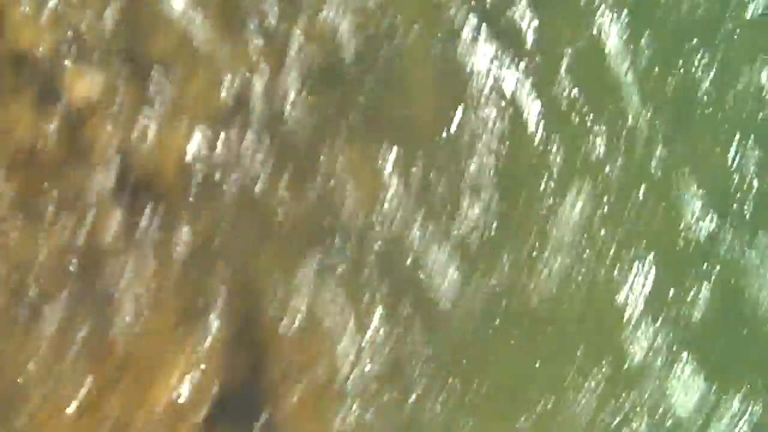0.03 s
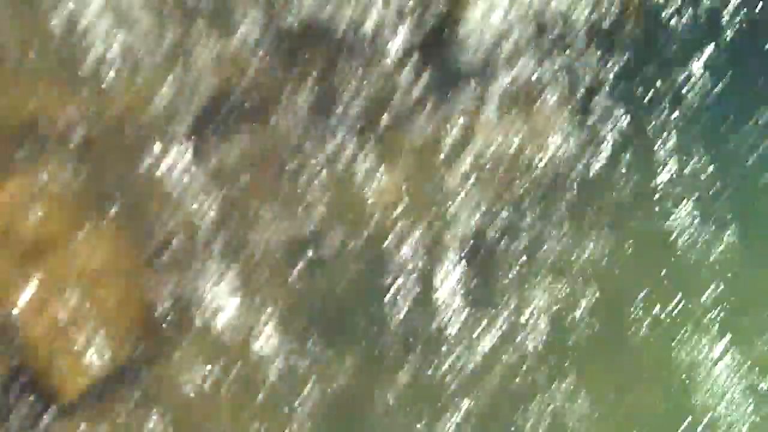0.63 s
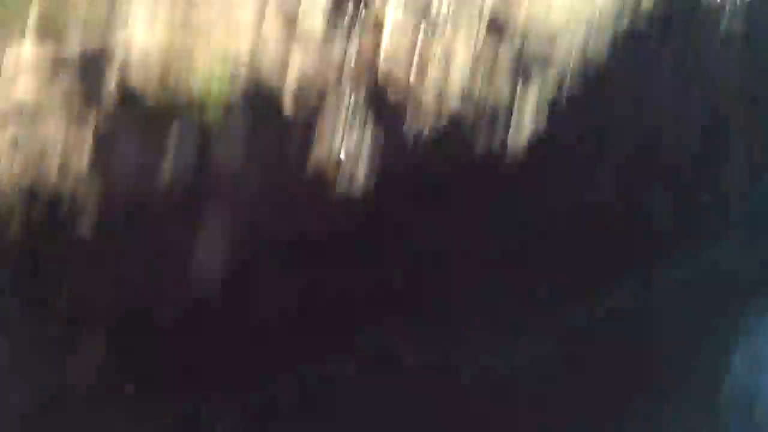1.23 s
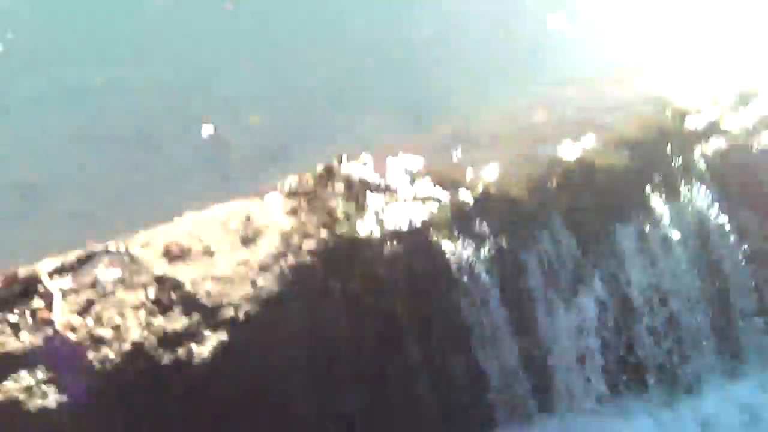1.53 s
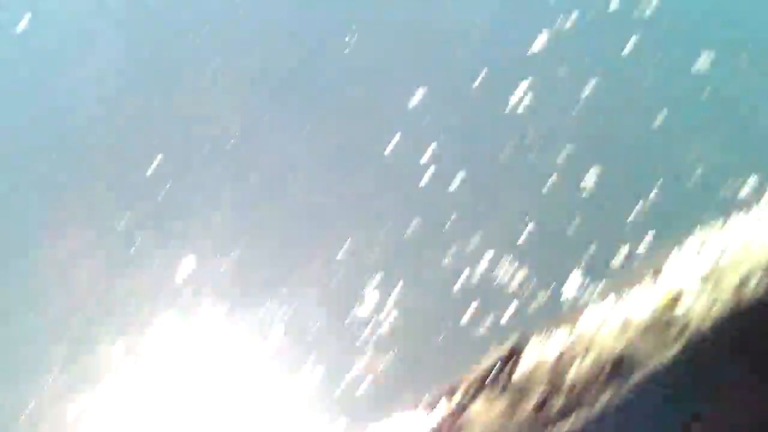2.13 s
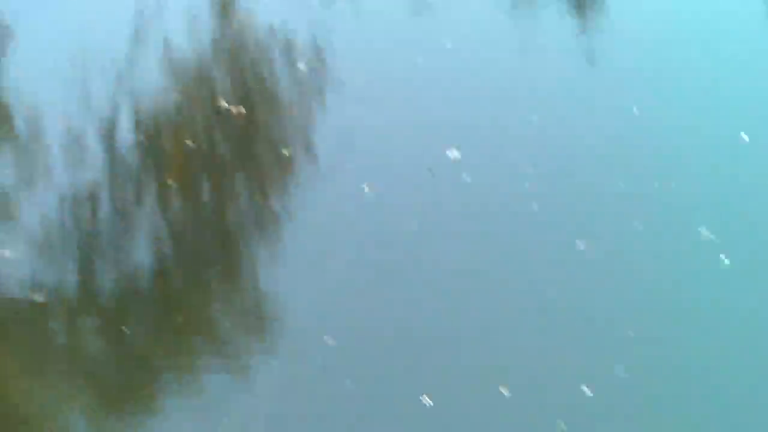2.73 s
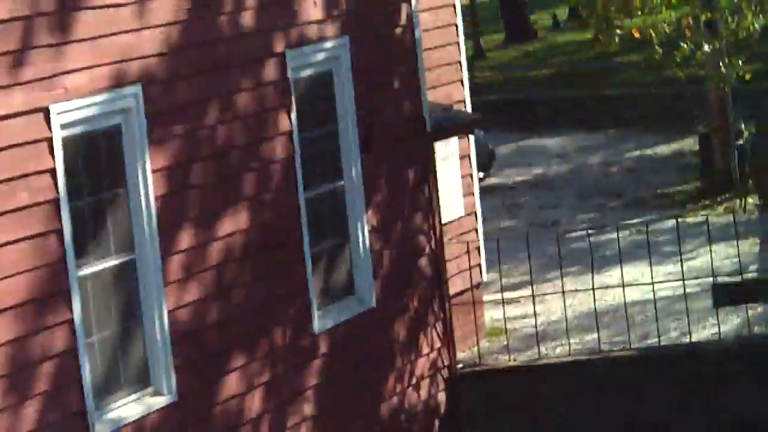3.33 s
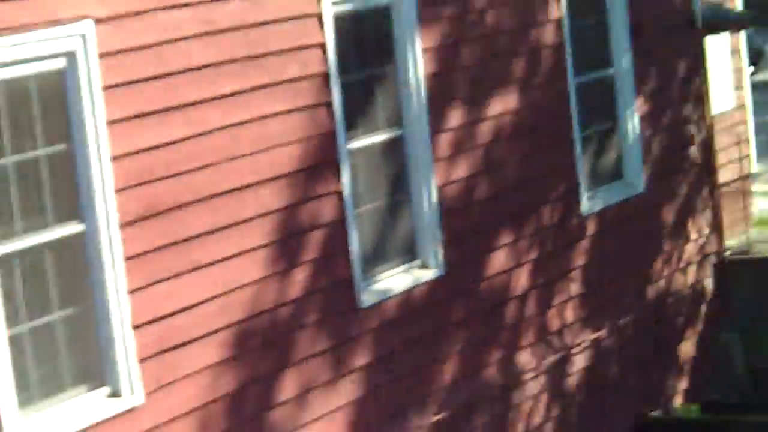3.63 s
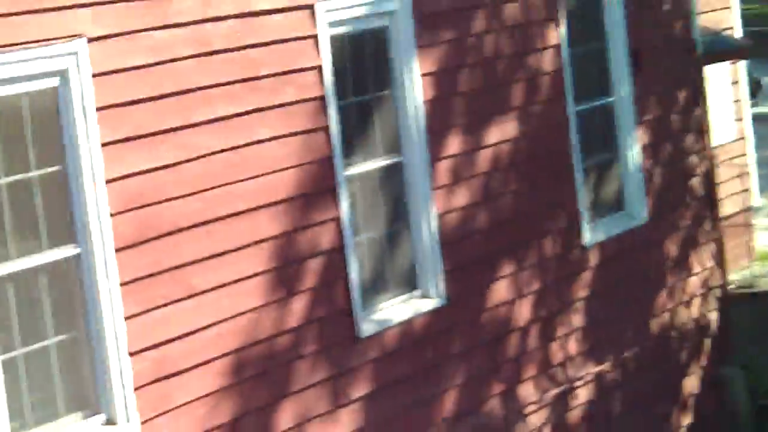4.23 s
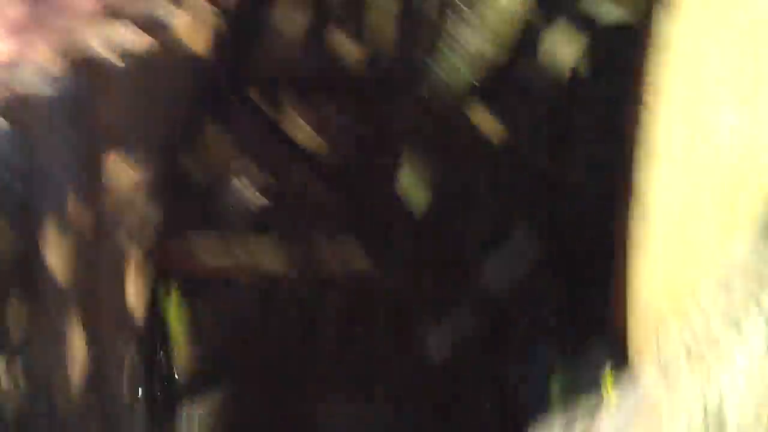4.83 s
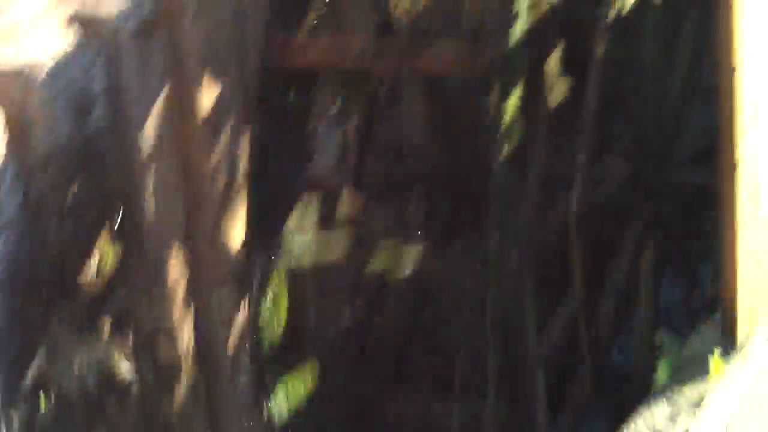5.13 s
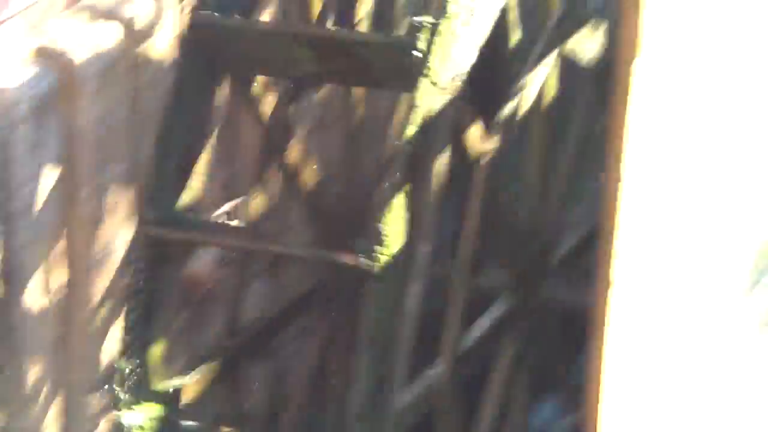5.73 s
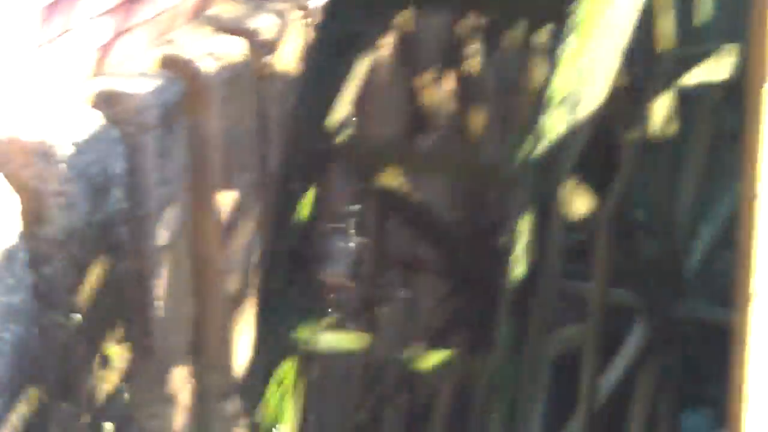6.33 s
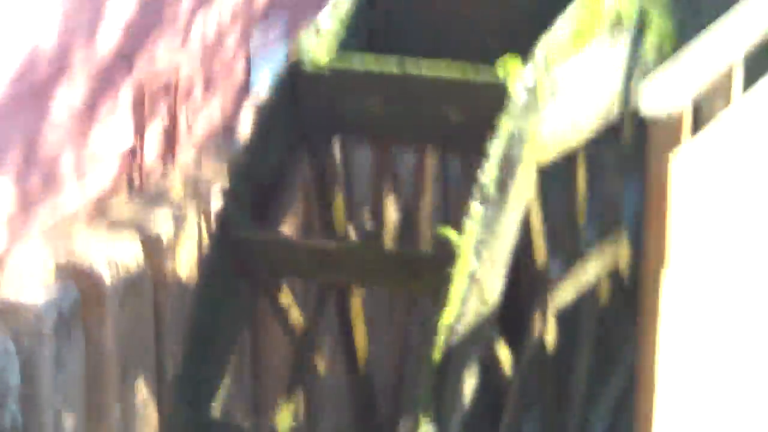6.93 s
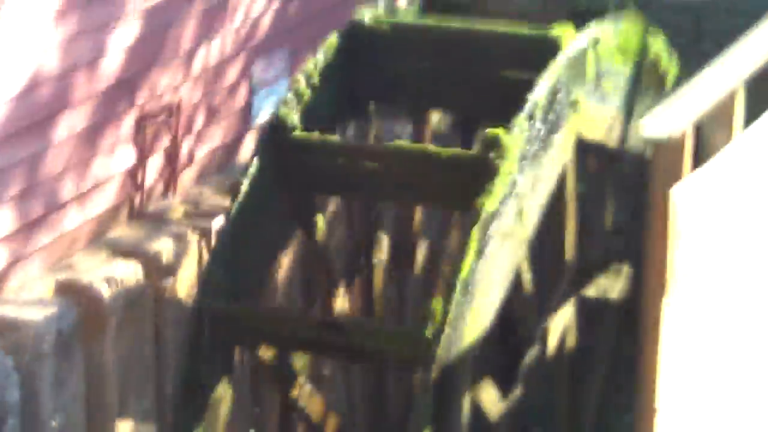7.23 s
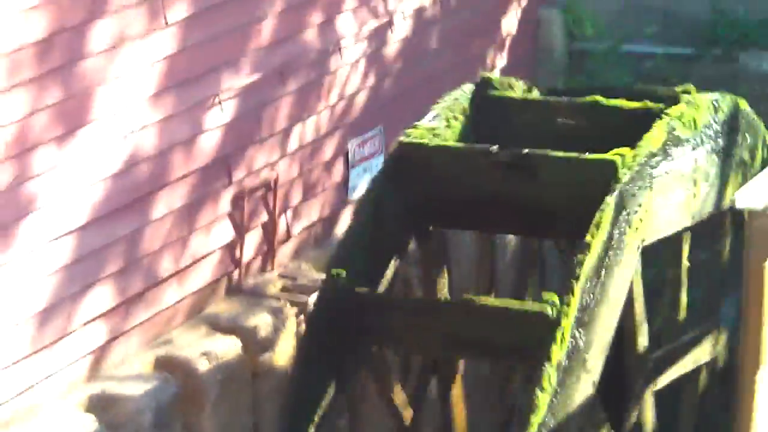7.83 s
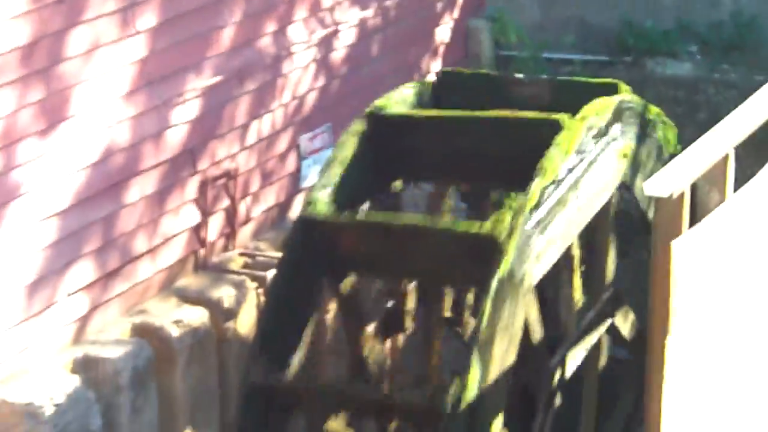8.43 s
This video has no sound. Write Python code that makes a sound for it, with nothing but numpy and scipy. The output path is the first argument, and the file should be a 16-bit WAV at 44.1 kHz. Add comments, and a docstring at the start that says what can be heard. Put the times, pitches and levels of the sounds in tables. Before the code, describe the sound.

A close, bubbling rush of water pulses as a mill wheel's buckets empty, with hollow gulps and low thumps of wind.

```python
"""A close rush of water, full of bubbles and spatter, pours over a low weir and off a turning mill wheel.
It surges as each bucket empties, a little over twice a second, and trapped air booms and gulps in it.
Gusts buffet the hand-held microphone; the colour shifts as it swings from stream to pond to wheel.
The weir throbs in passing; near the wheel, water churns with a hollow note and slaps the boards."""
import sys
import numpy as np
from scipy import signal
from scipy.fft import rfft, irfft, next_fast_len
from scipy.io import wavfile
from scipy.ndimage import uniform_filter1d

SR = 44100
rng = np.random.default_rng(int(sys.argv[2]) if len(sys.argv) > 2 else 0)


def generate_wav(sig):
    """Save sig (samples, or channels by samples) to the path in sys.argv[1] as 16-bit PCM at SR."""
    pcm = np.round(np.clip(np.atleast_2d(sig).T, -1, 1) * 32767).astype(np.int16)
    wavfile.write(sys.argv[1], SR, pcm)


N = 382788
T = np.arange(N) / SR


def gain_of(db):
    """Decibels to amplitude."""
    return 10 ** (np.asarray(db) / 20)


def unit_rms(x):
    """Scales to an rms of 1."""
    return x / np.sqrt(np.mean(x ** 2) + 1e-20)


def follow(rows):
    """The columns of a timed table, interpolated at every sample."""
    times, *columns = np.transpose(rows)
    return [np.interp(T, times, column) for column in columns]


def swell(centre_s, length_s):
    """A smooth rise and fall of height 1."""
    return np.exp(-(2 * (T - centre_s) / length_s) ** 2)


def filtered(x, gain):
    """Filters x by a gain given as a function of frequency."""
    size = next_fast_len(N)
    hz = np.fft.rfftfreq(size, 1 / SR) + 1e-3
    return irfft(rfft(x, size) * gain(hz), size)[:N]


def coloured(x, spectrum):
    """Gives x a spectrum that falls away beyond its end points, at an rms of 1."""
    points_hz, db = np.transpose(spectrum)

    def gain(hz):
        skirts = np.minimum(hz / points_hz[0], 1) ** 2 * np.minimum(points_hz[-1] / hz, 1) ** 2
        return skirts * gain_of(np.interp(np.log(hz), np.log(points_hz), db))
    return unit_rms(filtered(x, gain))


def noise_band(centre_hz, width_hz):
    """Noise in a bell-shaped band."""
    return filtered(rng.standard_normal(N), lambda hz: np.exp(-((hz - centre_hz) / width_hz) ** 2))


def wander(rate_hz):
    """Slow random motion of rms 1, up to about rate_hz."""
    return unit_rms(noise_band(0, rate_hz))


def foam(patchy_db, flutter_hz, bands=8):
    """Countless far bubbles merge to a hiss in which each size of bubble swells on its own."""
    noise, out = rng.standard_normal(N), np.zeros(N)
    log_centres = np.log(np.geomspace(300, 6000, bands))
    for share in np.eye(bands):
        band = filtered(noise, lambda hz: np.interp(np.log(hz), log_centres, share))
        out += band * gain_of(patchy_db * wander(flutter_hz))
    return unit_rms(out)


def bubbles(density, decay_cycles, rise, spread_db, sizes=40):
    """Each bubble rings briefly, rising in pitch as it nears the surface; small ones are more common."""
    out = np.zeros(N)
    for hz in np.geomspace(350, 6500, sizes):
        age = np.arange(int(5 * decay_cycles * SR / hz)) * hz / SR / decay_cycles  # in decay times
        envelope = np.exp(-age) * (1 - np.exp(-age * decay_cycles * 2))
        ring = envelope * np.sin(2 * np.pi * decay_cycles * age * (1 + rise * age))
        strength = gain_of(spread_db * np.minimum(rng.exponential(1, N), 3.5))
        births = rng.random(N) < density / sizes * np.sqrt(hz / 1500) / SR
        out += np.sqrt(hz) * unit_rms(signal.oaconvolve(strength * births, ring)[:N])
    return unit_rms(out)


def spatter(per_s, spread_db):
    """Drops hit the water and the wet boards as tiny clicks of uneven size."""
    strength = gain_of(spread_db * np.minimum(rng.exponential(1, N), 4))
    polarity = rng.choice([-1, 1], N)
    hits = rng.random(N) < per_s / SR
    return unit_rms(strength * polarity * hits)


# The flow between buckets, from where the microphone is held.
# Each row: time in seconds, then the levels of churn, spray and boom in dB.
STEADY_FLOW = [(0, -24, -26.5, -26.5), (1.2, -23, -26, -28.5), (3.4, -24.5, -29, -27), (5, -24, -28.5, -27),
               (8.68, -23.5, -28, -31)]
# Buckets emptying off the wheel.
# Each row: centre and length in seconds, then the swells of churn, spray and boom in dB.
BUCKET_SURGES = [(0.303, 0.16, 2, 1.8, 3), (0.74, 0.1, 1, 3, 5), (1.11, 0.26, 0, 2, 7),
                 (1.508, 0.099, 0, 1.8, 8.5), (1.95, 0.22, 1, 0.5, 4), (2.414, 0.17, 3.5, 0, -3),
                 (2.852, 0.16, 3, 2, 0), (3.285, 0.22, 3, 2, 0), (3.69, 0.075, 1.5, 1.5, 1),
                 (4.114, 0.32, 2.5, 1.5, 0), (4.535, 0.14, 2.5, 2.5, 0.5), (4.964, 0.35, 2, 2.2, -3.5),
                 (5.428, 0.22, 2, 1, 0.5), (5.733, 0.16, 2.5, 2, 2.5), (6.12, 0.26, 0, 1, 2),
                 (6.543, 0.13, 3, 2.5, 2.5), (6.93, 0.16, 1.5, 1.5, 3), (7.375, 0.2, 2, 1, 0.5),
                 (7.684, 0.36, 0.5, 1.5, 4), (8.163, 0.16, 2.5, 2, 1.5), (8.56, 0.21, 2, 2, 3.5)]


def flow():
    """Levels in dB of churn, spray and boom: the steady flow plus a swell as each bucket empties."""
    levels_db = np.array(follow(STEADY_FLOW))
    for centre_s, length_s, *swells_db in BUCKET_SURGES:
        levels_db += np.outer(swells_db, swell(centre_s, length_s))
    return levels_db


# The rush with the microphone on the stream, on the pond and on the wheel.
# Each row: frequency in Hz, relative level in dB.
STREAM_SPECTRUM = [(150, -17), (300, 4.5), (400, 1.5), (540, 0), (660, 3.5), (880, -2), (1200, 0),
                   (1750, -9), (2700, -10.5), (3400, -12.5), (3900, -17), (4600, -19.5), (5600, -29),
                   (7000, -39.5)]
POND_SPECTRUM = [(150, -9.5), (290, 5), (420, 2), (600, -1), (850, -2), (1020, -5.5), (1300, -2.5),
                 (1900, -11.5), (2700, -12.3), (3150, -12), (3380, -10), (3800, -15), (4700, -18),
                 (5600, -26.5), (6300, -30.5), (7000, -43.5)]
WHEEL_SPECTRUM = [(150, -10), (300, 4.5), (400, 2), (520, -1.5), (620, 0.9), (1000, -4), (1500, -4.5),
                  (2000, -8), (2550, -12), (3600, -11.5), (4100, -15), (4700, -18.5), (5600, -26.5),
                  (7000, -40)]
# The swing of the microphone. Each row: time in seconds, aim (0 stream, 1 pond, 2 wheel).
MIC_AIM = [(0, 0.13), (1.25, 0.091), (1.85, 0.96), (3.3, 1.3), (4.23, 2)]


def rush(churn_db, spray_db, split_hz=1700):
    """Foam, bubbles and spatter, coloured by the aim of the microphone and surging with the flow."""
    water = foam(patchy_db=0.63, flutter_hz=14)
    water += gain_of(-8) * bubbles(density=3200, decay_cycles=7.44, rise=0.017, spread_db=2.0)
    water += gain_of(-14) * spatter(per_s=2400, spread_db=3.5)
    water *= gain_of(0.29 * wander(26))  # the level flickers slightly
    aim, = follow(MIC_AIM)
    heard = np.zeros(N)
    for direction, spectrum in enumerate([STREAM_SPECTRUM, POND_SPECTRUM, WHEEL_SPECTRUM]):
        share = np.maximum(1 - abs(aim - direction), 0)
        heard += share * coloured(water, spectrum)
    churn = filtered(heard, lambda hz: 1 / (1 + (hz / split_hz) ** 6))
    spray = heard - churn
    return gain_of(churn_db) * unit_rms(churn) + gain_of(spray_db) * unit_rms(spray)


# The low end at the foot of the falling water. Each row: frequency in Hz, relative level in dB.
BOOM_SPECTRUM = [(40, -21), (90, -11), (155, -2), (203, 1.5), (245, -3.5), (320, -15.5), (600, -40)]
RUMBLE_SPECTRUM = [(15, -21.5), (34, -4.5), (44, -2), (56, -4.5), (100, -4.5), (135, -7), (250, -34.5)]


def plunge(boom_db, trim_db=0.2, uneven_db=1, rumble_db=-34):
    """Large air pockets boom unevenly under the falling water, over a steady deep rumble."""
    level = gain_of(boom_db + trim_db + uneven_db * wander(10))
    boom = level * coloured(rng.standard_normal(N), BOOM_SPECTRUM)
    rumble = gain_of(rumble_db) * coloured(rng.standard_normal(N), RUMBLE_SPECTRUM)
    return boom + rumble


# A surface close to the microphone. Each row: time in seconds, delay in ms, strength from 0 to 1.
NEAR_REFLECTION = [(0, 1.9, 0.07), (1.1, 1.73, 0.05), (2.4, 0.99, 0.07), (3.1, 0.95, 0.06),
                   (4.1, 0.96, 0.17), (4.8, 1.35, 0.03), (6.1, 1.48, 0.11), (6.9, 1.42, 0.06),
                   (8.68, 1.4, 0.07)]


def reflected(water):
    """A close reflection combs the sound of the water; the comb slides as the microphone moves."""
    delay_ms, strength = follow(NEAR_REFLECTION)
    echo = np.interp(T - delay_ms / 1000, T, water)
    return water + strength * echo


# Gusts right on the microphone. Each row: centre in seconds, relative peak in dB, length in seconds.
WIND_GUSTS = [(0.093, -22, 0.06), (0.274, -18.5, 0.11), (0.39, -21.5, 0.13), (0.626, -16, 0.08),
              (0.791, -17.5, 0.24), (1.07, -19, 0.2), (1.362, -21, 0.13), (1.542, -28, 0.1),
              (2.085, -28.5, 0.11), (3.396, -27.5, 0.06), (3.631, -22.5, 0.1), (3.851, -18, 0.24),
              (4.08, -20, 0.06), (4.275, -17.5, 0.2), (4.54, -18, 0.1), (4.719, -18.5, 0.15),
              (4.908, -19, 0.09), (5.073, -17.5, 0.06), (5.233, -20, 0.1), (5.51, -27, 0.06),
              (5.72, -24, 0.16), (6.03, -24, 0.097), (6.317, -19.5, 0.09), (6.587, -21, 0.08),
              (6.77, -17.5, 0.1), (6.884, -27.5, 0.068), (7.087, -20, 0.069), (7.24, -21.5, 0.16),
              (7.39, -21.5, 0.08), (7.548, -21, 0.06), (8.108, -21.5, 0.087), (8.27, -22, 0.1),
              (8.422, -18.5, 0.12), (8.622, -20.5, 0.12)]


def gust_level(breeze_db=-34, steepness=1.54):
    """Relative level of the wind in dB: each gust builds and dies away over a faint breeze."""
    power = gain_of(breeze_db) ** 2
    for centre_s, peak_db, length_s in WIND_GUSTS:
        falloff = (1 + (2 * (T - centre_s) / length_s) ** 2) ** steepness
        power = power + gain_of(peak_db) ** 2 / falloff
    return 10 * np.log10(power)


# Large and small eddies at the microphone. Each row: frequency in Hz, relative level in dB.
LARGE_EDDY_SPECTRUM = [(8, -11), (20, 2), (42, 3.5), (75, -2.5), (120, -7.5), (200, -17), (350, -33.5),
                       (900, -57)]
SMALL_EDDY_SPECTRUM = [(80, -7.5), (145, 2), (220, -10), (450, -24.5)]


def wind(large_db=-1, small_db=10, small_growth=2.12, lumpy_db=3, lull_db=-32):
    """Eddies hit the microphone as lumps of pressure; hard gusts shed smaller, higher ones."""
    gust_db = gust_level()
    air = rng.standard_normal(N) * gain_of(lumpy_db * wander(25))
    large = coloured(air, LARGE_EDDY_SPECTRUM)
    large /= np.sqrt(uniform_filter1d(large ** 2, size=4400))  # the gust alone sets their mean strength
    lull_gate = 1 / np.sqrt(1 + gain_of(lull_db - gust_db) ** 4)
    buffet = gain_of(gust_db + large_db) * lull_gate * large
    small = coloured(rng.standard_normal(N), SMALL_EDDY_SPECTRUM)
    return buffet + gain_of(small_growth * gust_db + small_db) * small


# Air trapped where the water lands. Each row: centre in seconds, pitch in Hz, half-width in Hz,
# relative level in dB, length in seconds.
AIR_GULPS = [(0.115, 510, 45, -30, 0.06), (0.234, 510, 45, -22.5, 0.049), (0.28, 195, 45, -20, 0.078),
             (0.637, 624, 70, -23, 0.069), (0.748, 1090, 100, -25, 0.078), (1.06, 720, 70, -27, 0.087),
             (1.18, 1250, 110, -25.5, 0.27), (1.88, 1340, 130, -28, 0.33), (2.407, 440, 120, -23, 0.2),
             (2.603, 1160, 110, -27, 0.098), (2.847, 202, 25, -19, 0.08), (3.324, 970, 130, -30, 0.2),
             (3.69, 780, 128, -26, 0.27), (4.129, 195, 35, -19, 0.049), (4.134, 900, 130, -28, 0.24),
             (4.548, 774, 110, -22, 0.093), (5.37, 581, 60, -26, 0.057), (5.717, 645, 80, -26, 0.06),
             (5.968, 645, 85, -23, 0.09), (6.127, 700, 60, -21, 0.07), (6.527, 1190, 70, -26, 0.094),
             (6.598, 630, 85, -23, 0.16), (6.923, 750, 100, -23, 0.077), (7.332, 690, 75, -24, 0.12),
             (7.65, 796, 80, -23, 0.065), (7.704, 181, 35, -22, 0.049), (8.174, 685, 110, -30, 0.06),
             (8.187, 390, 70, -23, 0.077), (8.553, 796, 80, -29, 0.093), (8.627, 200, 30, -20.5, 0.06)]


def gulps(trim_db=-3):
    """A cloud of large bubbles of like size gives one surge a hollow note."""
    out = np.zeros(N)
    for centre_s, pitch_hz, width_hz, db, length_s in AIR_GULPS:
        cloud = noise_band(pitch_hz, width_hz)
        envelope = swell(centre_s, length_s)
        cloud_rms = np.sqrt(np.average(cloud ** 2, weights=envelope ** 2))
        out += gain_of(db + trim_db) * envelope * cloud / cloud_rms
    return out


# Single eddies striking the microphone within the gusts.
# Each row: centre in seconds, pitch in Hz, relative peak in dB.
EDDY_THUMPS = [(0.207, 44, -12), (0.258, 44, -14), (0.271, 110, -10), (0.3, 62, -2.5), (0.333, 35, -7),
               (0.373, 88, -8.5), (0.44, 70, -13), (0.611, 70, -11), (0.716, 58, -6), (0.769, 44, -11),
               (0.782, 88, -9), (0.858, 88, -11), (0.88, 70, -8), (3.581, 110, -10), (3.633, 88, -4),
               (3.735, 88, -7), (3.756, 44, -10), (3.796, 55, -5), (3.817, 55, -10), (3.839, 88, -8),
               (3.88, 70, -16), (3.912, 55, -9), (3.954, 88, -3.5), (3.988, 70, -13), (4.071, 24, -8),
               (4.092, 55, -14), (4.174, 44, -9), (4.222, 35, -9.5), (4.256, 55, -11), (4.288, 70, -8),
               (4.545, 70, -11), (4.601, 44, -5.5), (4.816, 55, -10.5), (4.89, 44, -11), (4.941, 35, -12),
               (5.23, 88, -10), (6.351, 44, -8), (6.375, 55, -13), (6.648, 70, -6.5), (6.746, 70, -10),
               (7.073, 32, -11), (7.394, 55, -11.5), (8.28, 55, -10.4), (8.316, 70, -6.5), (8.35, 70, -11)]


def thumps(trim_db=-1.5):
    """An eddy passes as one pulse of pressure between two shallow rebounds; smaller ones sound higher."""
    out = np.zeros(N)
    spins = rng.choice([-1, 1], len(EDDY_THUMPS))
    for (centre_s, pitch_hz, db), spin in zip(EDDY_THUMPS, spins):
        passage = (np.pi * pitch_hz * (T - centre_s)) ** 2
        out += spin * gain_of(db + trim_db) * (1 - 2 * passage) * np.exp(-passage)
    return out


# The weir from close by, in passing. Each row: frequency in Hz, level in dB at the nearest point.
WEIR_TONES = [(47.5, -34), (70, -40)]


def weir_throb(nearest_s=1.9, length_s=0.7, waver=0.019):
    """The curtain of water over the weir flutters with a deep, wavering hum."""
    hum = np.zeros(N)
    for hz, db in WEIR_TONES:
        cycles = np.cumsum(hz * (1 + waver * wander(4))) / SR
        hum += gain_of(db) * unit_rms(np.sin(2 * np.pi * cycles))
    return hum * swell(nearest_s, length_s)


def bucket_note(churn_db, offset_db=-11, slosh=0.08):
    """Water churns in the buckets with a hollow, swaying note, heard when facing the wheel."""
    note = unit_rms(noise_band(centre_hz=700, width_hz=115))
    sway = np.cumsum(1 + slosh * wander(4))
    swayed = np.interp(sway, np.arange(N), note, period=N)
    aim, = follow(MIC_AIM)
    facing_wheel = np.clip(aim - 1, 0, 1)
    return gain_of(churn_db + offset_db) * facing_wheel * swayed


# Water on the boards, close to the wheel.
# Each row: start in seconds, relative level in dB, decay in seconds.
BOARD_SLAPS = [(4.94, -30, 0.037), (5.71, -24, 0.059), (6.115, -21, 0.02), (6.51, -27, 0.04),
               (6.905, -23, 0.03), (7.652, -22, 0.016), (8.12, -27, 0.043)]
# One slap from the same spot. Each row: frequency in Hz, relative level in dB.
SLAP_SPECTRUM = [(220, 1.5), (450, 0), (900, -8), (1700, 0), (3500, -10.5), (4700, -22), (6500, -42)]


def slaps(trim_db=-1, attack_s=0.011):
    """A sheet of water bursts on the boards into a quickly thinning shower of drops."""
    shower = coloured(spatter(per_s=4600, spread_db=2.5), SLAP_SPECTRUM)
    level = np.zeros(N)
    for start_s, db, decay_s in BOARD_SLAPS:
        age = np.maximum(T - start_s, 0)
        attack = np.minimum(age / attack_s, 1)
        level += gain_of(db + trim_db) * attack * np.exp(-(age / decay_s) ** 2 / 2)
    return level * shower


def scene():
    """The water with its reflection, and the wind at the microphone, in mono."""
    churn_db, spray_db, boom_db = flow()
    water = rush(churn_db, spray_db) + bucket_note(churn_db) + gulps() + slaps()
    water += plunge(boom_db) + weir_throb()
    return (reflected(water) + wind() + thumps())[None]


def record(dry, start_s=0.036, fade_s=0.032, ceiling=0.62, cutoff_hz=7280):
    """The sound fades in quickly; the recorder rounds off the hardest gusts and cuts the high treble."""
    faded = dry * np.clip((T - start_s) / fade_s, 0, 1)
    rounded = faded / (1 + (faded / ceiling) ** 6) ** (1 / 6)
    low_pass = signal.firwin(401, cutoff_hz, window=("kaiser", 9), fs=SR)
    return signal.oaconvolve(rounded, low_pass[None], "same")


dry = scene()
out = record(dry)
generate_wav(out)
```